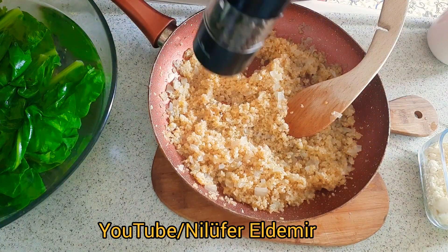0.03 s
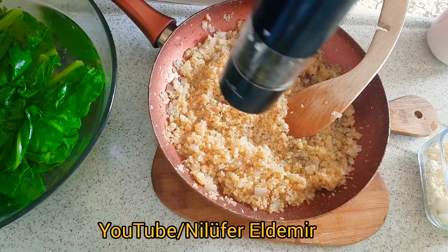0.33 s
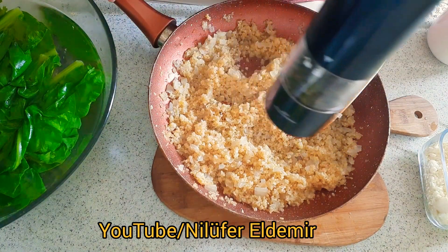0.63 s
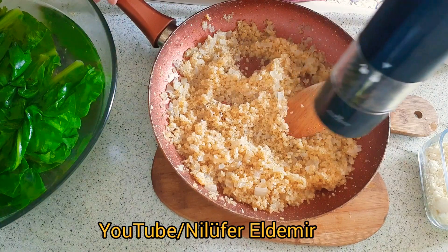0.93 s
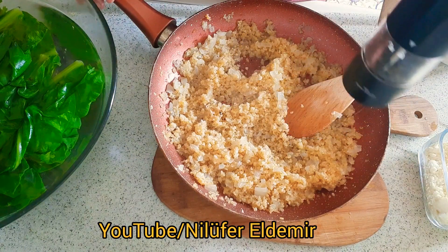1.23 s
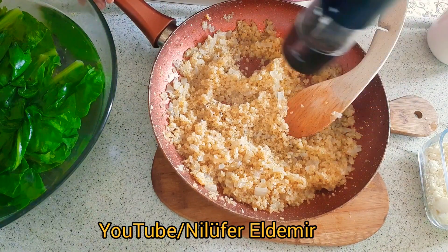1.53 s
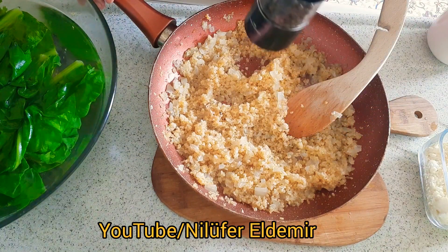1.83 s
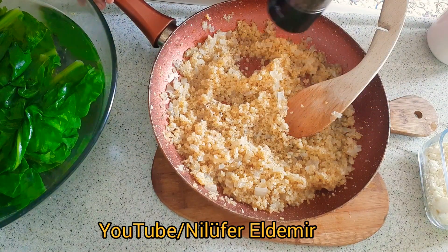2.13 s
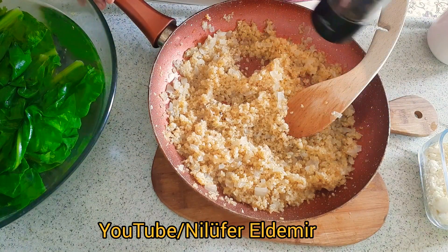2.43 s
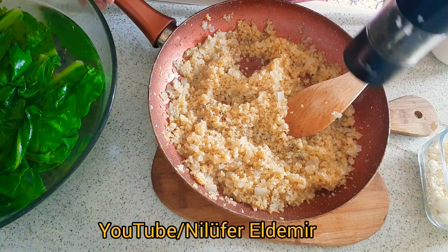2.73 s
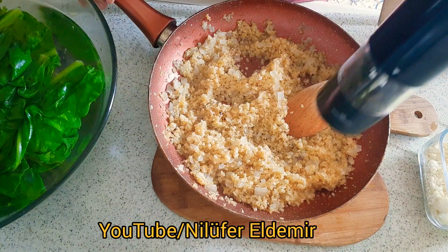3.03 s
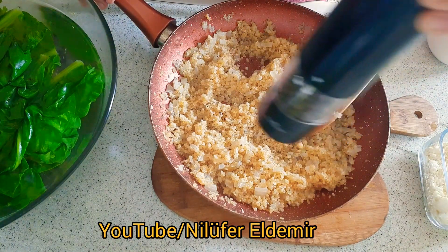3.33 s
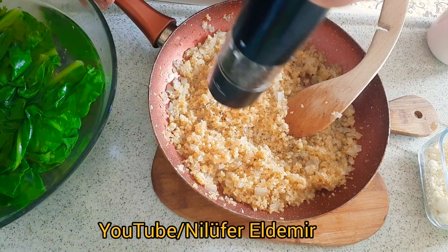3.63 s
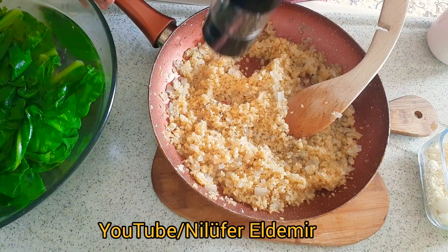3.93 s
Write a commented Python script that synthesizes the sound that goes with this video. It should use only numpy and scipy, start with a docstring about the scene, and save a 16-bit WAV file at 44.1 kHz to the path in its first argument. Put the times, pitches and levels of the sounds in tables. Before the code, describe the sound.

An electric pepper grinder whirs close to the microphone, sweeping from side to side in a small kitchen. Its motor keeps dipping as the gears rasp and squeal, with a few faint knocks later on and a low appliance hum underneath.

```python
"""In a small kitchen, a battery pepper grinder is swept to and fro over a pan.
Its motor whirs and turns a set of gears. Whenever the burr (the grinding part) bites into pepper,
the motor slows and the gears howl, rasp and squeal. Now and then a peppercorn cracks and gives the
plastic housing a dull knock. Appliances hum and rumble faintly underneath."""
import sys
import numpy as np
from scipy import signal
from scipy.fft import rfft, irfft
from scipy.io import wavfile
from scipy.ndimage import map_coordinates

SR = 44100
rng = np.random.default_rng(int(sys.argv[2]) if len(sys.argv) > 2 else 0)


def generate_wav(sig):
    """Save sig (samples, or channels by samples) to the path in sys.argv[1] as 16-bit PCM at SR."""
    pcm = np.round(np.clip(np.atleast_2d(sig).T, -1, 1) * 32767).astype(np.int16)
    wavfile.write(sys.argv[1], SR, pcm)


N = 176400
T = np.arange(N) / SR
HZ = np.maximum(np.arange(N + 1) * SR / (2 * N), 1)   # the frequencies that filtered() works on
TEETH = 11   # gear teeth that meet in one turn of the motor


def motor(turns, load_db):
    """The spinning motor hums low and whines high; the whine grows when it works harder."""
    # tones of the low hum: times_per_turn, level_db
    hum_tones = [(3, -51)]
    # tones of the whine: times_per_turn, level_db
    whine_tones = [(8, -38), (9, -44.5), (12, -39.5), (14, -44.5), (16, -45), (21, -50), (26, -48),
                   (28, -50.5)]
    hum = sum(from_db(db + 2.5 * drift(18)) * tone(k * turns) for k, db in hum_tones)
    whine = sum(from_db(db + 2.5 * drift(18)) * tone(k * turns) for k, db in whine_tones)
    whine = filtered(whine, 1 / np.sqrt(1 + (1345 / HZ) ** 40))   # little below 1345 Hz leaves the shell
    return hum + whine * from_db(0.34 * load_db)


def bites():
    """Each bite of the burr loads the motor and makes the gears howl; returns both curves in dB."""
    # the burr gripping pepper: start_s, length_s, load_rise_db, howl_rise_db
    grips = [(0.015, 0.022, 5, 5), (0.135, 0.069, 5, -5), (0.218, 0.044, 4.5, 13.5),
             (0.478, 0.027, 5, 11.5), (0.538, 0.11, 5, 9), (0.651, 0.049, 7, 13), (0.802, 0.095, 4, 12.5),
             (1.078, 0.097, 4, 12), (1.272, 0.075, 6.5, 16.5), (1.39, 0.054, 6.5, 21.5),
             (1.515, 0.062, 5.5, 17), (1.653, 0.044, 8.5, 14.5), (1.718, 0.16, 4.5, 6),
             (1.956, 0.099, 3.5, 5.5), (2.057, 0.082, 6, 10.5), (2.361, 0.083, 3, 9),
             (2.451, 0.097, 4.5, 16.5), (2.621, 0.075, 4.5, 17), (2.703, 0.11, 3.5, 9),
             (2.899, 0.03, 2.5, 12), (2.962, 0.037, 5.5, 15), (3.05, 0.12, 6, 11), (3.318, 0.1, 6, 10.5),
             (3.433, 0.059, 4.5, 3), (3.672, 0.048, 4.5, 6.5), (3.837, 0.089, 4, -2)]
    attack_s, release_s = 0.016, 0.017
    load_db, howl_db = -4 + 0.5 * drift(20), 0   # running free
    for start, length, load_rise_db, howl_rise_db in grips:
        grip = np.clip((T - start) / attack_s, 0, 1) - np.clip((T - start - length) / release_s, 0, 1)
        load_db += load_rise_db * grip
        howl_db += howl_rise_db * grip
    return load_db, howl_db


def gear_howl(turns, howl_db, rough_db=2.0):
    """The meeting teeth make tones that follow the bites and sound through the housing."""
    # tones of the gears: times_per_tooth, level_db, share_of_howl_rise
    gear_tones = [(1, -39, 0.88), (2, -43, .8), (3, -44, 0.8), (4, -37, 0.75)]
    return housing(sum(from_db(db + share * howl_db + rough_db * drift(105)) * tone(k * TEETH * turns)
                       for k, db, share in gear_tones))


def squeal(turns, speed, load_db):
    """The straining gears slip and squeal when the motor is dragged below 168 turns a second."""
    # tones of the squeal: times_per_tooth, level_db
    squeal_tones = [(2, -36), (3, -34.5), (4, -43)]
    strain = np.clip((168 - speed) / 9, 0, 1) * from_db(0.9 * load_db)
    slipping = turns + 0.0014 * drift(120)
    return strain * sum(from_db(db + 3 * drift(38)) * tone(k * TEETH * slipping)
                        for k, db in squeal_tones)


def tooth_strikes(turns, load_db):
    """Each gear tooth hits with a different strength and rings the housing."""
    hits = np.diff(np.floor(TEETH * turns), prepend=0) > 0
    clicks = hits * rng.standard_normal(N) * from_db(-0.5 * drift(110))
    return from_db(-36.5 + 1.54 * load_db) * rms_one(housing(clicks))


def rattle(turns, load_db, throb=0.18):
    """The gears and the motor's brushes rub, making a noise that pulses once a turn."""
    # tone colour of the rubbing: pitch_hz, relative_level_db
    colour = [(250, -17.5), (600, -13), (1150, -12.5), (1370, 0.5), (1640, -10.5), (1900, 2), (2200, -3.5),
              (2750, 0.5), (3150, -4.5), (3700, -1.5), (4100, -7.5), (4700, 1.5), (5700, -2.5), (7000, -8),
              (8700, -16.5), (9900, -23.5), (11200, -16), (12200, -11.5), (13200, -15), (15800, -23)]
    pulse = 1 + throb * np.cos(2 * np.pi * turns)
    rubbing = rng.standard_normal(N) * pulse * from_db(drift(54))
    return from_db(-32.5 + 0.52 * load_db) * rms_one(filtered(rubbing, gains(colour)))


def crunch(load_db, cracks_per_s=900, spread_db=2.5):
    """Pepper breaks in the burr with many tiny, bright clicks."""
    clicks = (rng.random(N) < cracks_per_s / SR) * rng.choice([-1, 1], N)
    strength = from_db(spread_db * np.minimum(rng.exponential(1, N), 4))
    treble = signal.butter(1, [4440, 13000], "band", fs=SR, output="sos")
    return from_db(-43 + 1.12 * load_db) * rms_one(signal.sosfilt(treble, clicks * strength))


def knocks():
    """A cracking peppercorn jolts the housing, which rings briefly."""
    # peppercorns cracking: start_s, strength_db
    cracks = [(1.705, -15), (2.669, -6), (2.763, -15), (3.414, -1.5), (3.726, -14), (3.927, -15.5)]
    # ringing notes of the jolted housing: pitch_hz, level_db, ring_s
    notes = [(605, -17, .016), (970, -13.5, 0.005), (1414, -13, 0.027), (1900, -3.5, 0.011),
             (2440, -12, 0.012)]
    clicks = np.zeros(N)
    for start, db in cracks:
        clicks[int(start * SR)] = from_db(db)
    jolts = signal.sosfilt(signal.butter(2, [763, 2820], "band", fs=SR, output="sos"), clicks)
    return sum(from_db(db) * ring(jolts, hz, ring_s) for hz, db, ring_s in notes)


def housing(x):
    """The plastic shell rings at its own pitches and gives off little bass."""
    # pitches the shell favours: pitch_hz, width_hz, level_db
    peaks = [(1420, 66, 0), (1942, 247, 2.5), (3553, 130, -3), (4620, 790, -16.5), (5520, 700, -3.5),
             (6190, 760, -5.5), (12330, 470, -13)]
    body = sum((-1) ** k * from_db(db) * resonate(x, hz, width)
               for k, (hz, width, db) in enumerate(peaks))
    return signal.sosfilt(signal.butter(2, 1200, "high", fs=SR, output="sos"), body)


def kitchen(x, echo_db):
    """The moving grinder reaches the nearer microphone sooner and louder; echoes follow."""
    # path of the grinder: time_s, position (-1 left to 1 right)
    path = [(0, -0.2), (.45, -0.026), (1.25, 0.81), (1.8, 0.16), (2.15, 0.15), (2.65, 0.75), (3.0, 0.76),
            (3.65, -0.32), (4, -0.06)]
    position = in_time(path)
    lag_s = 0.00024 * position   # how far the left side lags behind the right
    balance_db = 2 - 6 * position   # left minus right, leaning a little to the left
    direct = np.array([map_coordinates(x, [(T - side * lag_s / 2) * SR], order=3)
                       * from_db(side * balance_db / 2) for side in (1, -1)])
    return direct + from_db(echo_db) * moving_echoes(x)


def moving_echoes(x, spots_per_s=5):
    """As the grinder moves, the echoes of one spot blend into those of the next."""
    out, step = np.zeros((2, N + SR)), SR // spots_per_s
    for centre in range(0, N + step, step):
        i = np.arange(max(centre - step, 0), min(centre + step, N))
        piece = x[i] * np.cos(np.pi / 2 * (i - centre) / step)
        echoes = signal.fftconvolve([piece], reflections())
        out[:, i[0]:i[0] + echoes.shape[1]] += echoes
    return out[:, :N]


def reflections(size=16384):
    """Sound bounces off nearby things and around the room; below 1000 Hz both sides are alike."""
    t = T[:size]
    near = from_db(-60 * t / 0.038) * (t > 0.001)   # pan, worktop and wall: gone in 0.038 s
    room = from_db(-60 * t / 0.24) * (t > 0.005)   # whole kitchen: gone in 0.24 s
    power = sum(from_db(db) ** 2 * fade ** 2 / np.sum(fade ** 2) for db, fade in ((3, near), (-5, room)))
    mid, side = rfft(rng.standard_normal((2, size)) * np.sqrt(power))
    alike = 1 / (1 + (np.arange(len(mid)) * SR / size / 1000) ** 2)
    return irfft(np.sqrt(1 + alike) * mid + np.sqrt(1 - alike) * side * [[1], [-1]]) / np.sqrt(2)


def appliances():
    """Kitchen appliances rumble faintly and hum with the mains power."""
    # tone colour of the rumble: pitch_hz, relative_level_db
    colour = [(20, -28), (45, -4), (65, 3), (105, -3.5), (165, 4.5), (230, 2), (310, -11), (400, -11.5),
              (640, -4), (2000, -15.5)]
    # tones of the hum: pitch_hz, level_db
    hum_tones = [(49.7, -52.5), (148, -56), (357, -58.5)]
    mid, side = rms_one(filtered(rng.standard_normal((2, N)), gains(colour)))
    side = filtered(side, np.minimum(HZ / 950, 1))   # left and right differ fully above 950 Hz
    hum = sum(from_db(db + 2.1 * drift(7.3)) * tone(hz * T) for hz, db in hum_tones)
    return from_db(-45.5) * (mid + side * [[1], [-1]]) + hum


def from_db(db):
    """Turn decibels into a number to multiply by."""
    return 10 ** (np.asarray(db) / 20)


def rms_one(x):
    """Scale a signal so that its average strength (rms) is 1."""
    return x / np.sqrt(np.mean(x ** 2) + 1e-20)


def in_time(rows):
    """Join (time_s, value) points into a curve with a value at every sample."""
    return np.interp(T, *np.transpose(rows))


def gains(points):
    """Join (pitch_hz, level_db) points into a gain for every frequency."""
    hz, db = np.transpose(points)
    return from_db(np.interp(np.log(HZ), np.log(hz), db))


def filtered(x, response):
    """Turn each frequency up or down by its gain."""
    return irfft(rfft(x, 2 * N) * response)[..., :N]


def drift(rate_hz):
    """A random wobble of typical size 1, mostly slower than rate_hz."""
    return rms_one(filtered(rng.standard_normal(N), 1 / (1 + (HZ / rate_hz) ** 2)))


def resonate(x, hz, width_hz):
    """Let through a band around one pitch."""
    r = np.exp(-np.pi * width_hz / SR)
    feedback = [1, -2 * r * np.cos(2 * np.pi * hz / SR), r * r]
    return signal.lfilter(np.array([1, 0, -1]) * (1 - r * r) / 2, feedback, x + 1e-18)


def ring(clicks, hz, ring_s):
    """Each click starts a pure note that fades by 60 dB in ring_s."""
    r, w = 1000 ** (-1 / (ring_s * SR)), 2 * np.pi * hz / SR
    return signal.lfilter([0, np.sin(w)], [1, -2 * r * np.cos(w), r * r], clicks + 1e-18)


def tone(cycles):
    """A pure tone of strength 1 that starts at a random point in its wave."""
    return np.sqrt(2) * np.sin(2 * np.pi * (cycles + rng.random()))


def scene():
    """The motor's speed and load drive the grinder's sounds; knocks and the kitchen join them."""
    # motor speed, dragged down when the burr grips: time_s, turns_per_s
    speeds = [(0.03, 168.3), (0.13, 175.7), (0.2, 162.4), (0.27, 162.0), (0.37, 170.9), (0.48, 174.0),
              (0.58, 167.3), (0.66, 167.1), (0.72, 162.3), (0.76, 171.3), (0.81, 172.4), (0.88, 164.3),
              (0.97, 170.6), (1.04, 172.1), (1.11, 166.9), (1.28, 171.6), (1.33, 159.2), (1.41, 167.1),
              (1.45, 160.3), (1.53, 168.8), (1.6, 149.6), (1.66, 168.6), (1.71, 160.0), (1.78, 165.8),
              (1.83, 152.8), (1.88, 148.8), (1.95, 170.1), (2.08, 167.3), (2.13, 154.9), (2.17, 158.0),
              (2.23, 171.1), (2.32, 166.7), (2.36, 171.1), (2.43, 163.8), (2.47, 168.1), (2.52, 158.5),
              (2.56, 158.3), (2.63, 170.7), (2.69, 159.9), (2.83, 161.5), (2.88, 170.1), (2.99, 166.4),
              (3.1, 168.3), (3.16, 157.8), (3.25, 170.6), (3.33, 170.7), (3.37, 159.4), (3.43, 139.7),
              (3.52, 158.4), (3.56, 171.7), (3.67, 174.2), (3.73, 168.6), (3.85, 169.7), (3.97, 167.1)]
    load_db, howl_db = bites()
    speed = in_time(speeds) * (1 + 0.003 * drift(15))
    turns = np.cumsum(speed) / SR
    gear_turns = turns + 0.005 * drift(40)   # the gears sit a little loose
    throb = 1 + 0.39 * np.cos(2 * np.pi * turns)   # off-centre gears swell once a turn
    swell = from_db(0.08 * np.maximum(speed.mean() - speed, 0))   # a little louder as the motor slows
    tones = swell * (motor(turns, load_db) + throb * gear_howl(gear_turns, howl_db))
    tones += throb * squeal(gear_turns, speed, load_db)
    rasp = throb * tooth_strikes(gear_turns, load_db) + rattle(turns, load_db) + crunch(load_db)
    # some rattle reaches each microphone by its own paths
    scattered = from_db(-6) * np.array([rattle(turns, load_db), rattle(turns, load_db)])
    grinder = kitchen(tones, echo_db=-7.5) + kitchen(rasp, echo_db=1) + kitchen(knocks(), echo_db=-1.5)
    return grinder + scattered + appliances()


def record(dry, cutoff_hz=15850):
    """Each microphone has its own tone colour, and the highest treble is cut off."""
    # balance between the two microphones: pitch_hz, left_minus_right_db
    balance = [(400, 1), (740, -2), (1300, 1), (3300, 1), (5500, -2), (9000, -10), (12500, 1), (15000, -3)]
    colour = gains(balance) ** np.array([[.5], [-.5]])
    return filtered(dry, colour / np.sqrt(1 + (HZ / cutoff_hz) ** 300))


dry = scene()
out = record(dry)
generate_wav(out)
```